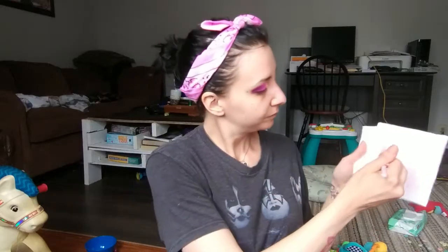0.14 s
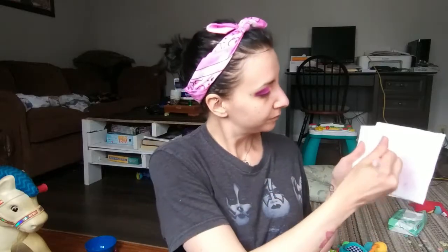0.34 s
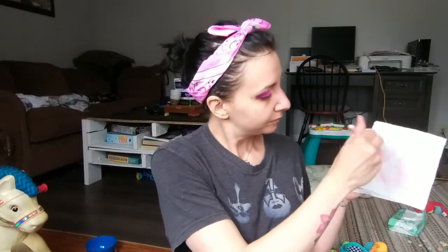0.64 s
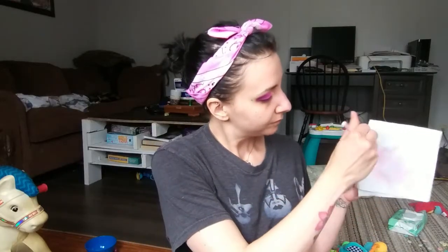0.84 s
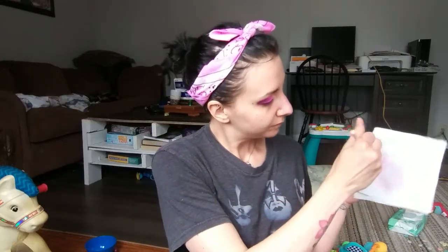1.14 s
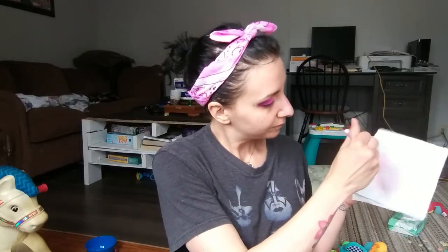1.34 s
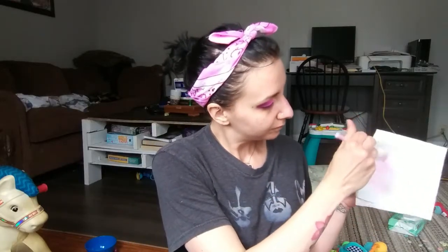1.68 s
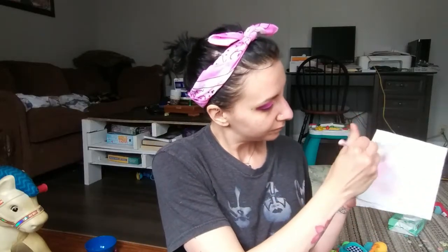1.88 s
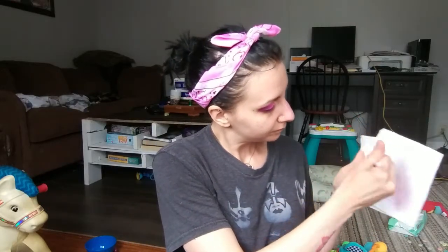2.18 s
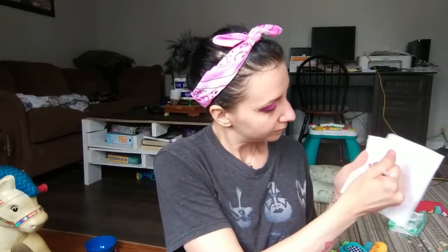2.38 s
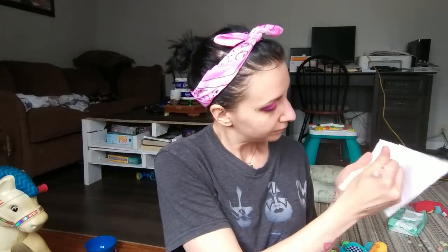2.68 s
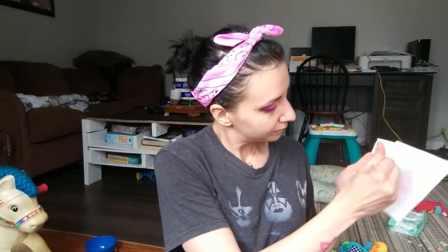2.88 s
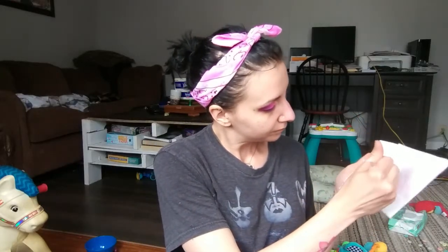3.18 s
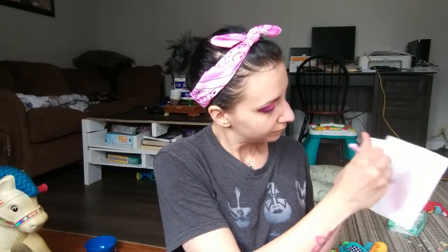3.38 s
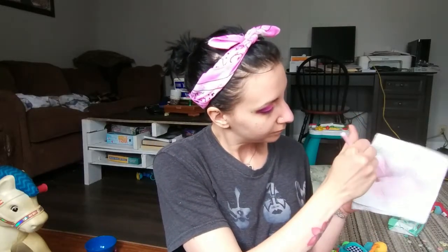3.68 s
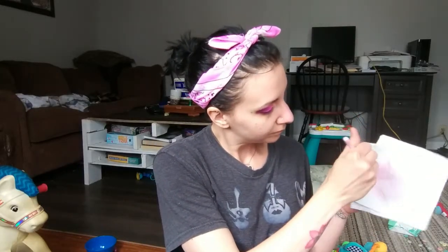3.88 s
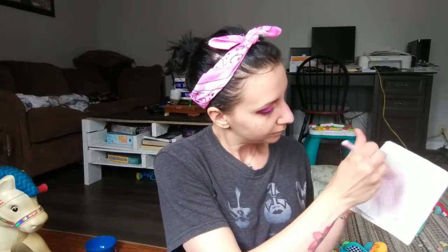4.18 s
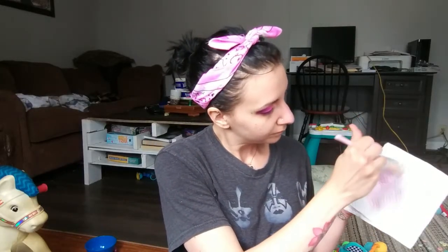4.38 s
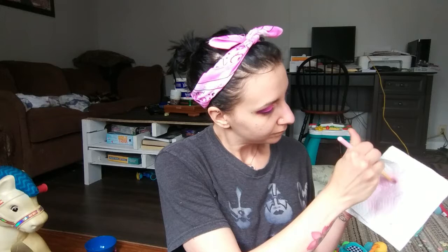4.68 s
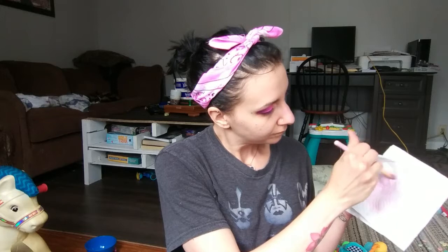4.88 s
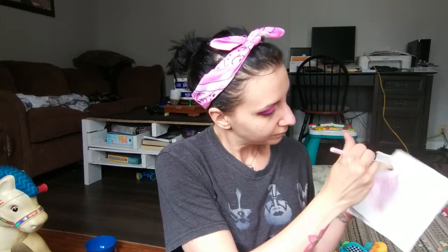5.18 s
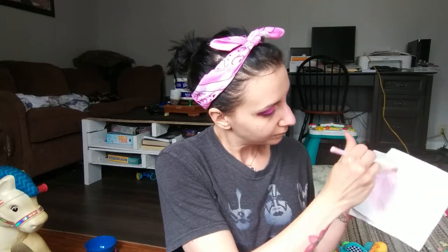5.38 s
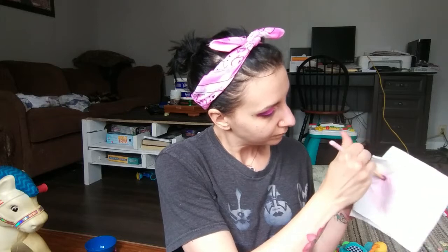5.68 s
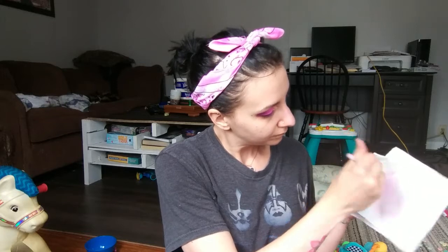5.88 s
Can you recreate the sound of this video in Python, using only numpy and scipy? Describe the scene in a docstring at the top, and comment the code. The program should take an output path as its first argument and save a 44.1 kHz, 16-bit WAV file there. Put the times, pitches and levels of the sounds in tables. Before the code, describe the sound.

A soft brush scrubs a paper towel back and forth in quick dry scratches, with small bright cracks, over a low wavering room hum.

```python
"""In a living room, close to a small stereo microphone, a makeup brush scrubs a hand-held paper towel.
About ten strokes a second: bristles flick as clumped random grains and now and then snag with a bright crack.
Behind them an appliance hums and blows: a beating tone, a motor tone, and noise that rings a duct.
Further off, shaped noise makes a dull scuff, a faint swelling hiss and a few soft low thuds.
Echoes die away in the furnished room, and the microphone port rings near 8 kHz."""
import sys
import numpy as np
from scipy import signal
from scipy.fft import rfft, irfft, next_fast_len
from scipy.io import wavfile

SR = 44100
rng = np.random.default_rng(int(sys.argv[2]) if len(sys.argv) > 2 else 0)


def file_out(sig):
    """Save sig as 16-bit WAV at sys.argv[1]."""
    # one column per channel
    cols = np.atleast_2d(sig).T
    # limit, then scale
    lim = np.clip(cols, -1, 1)
    pcm = np.round(lim * 32767).astype(np.int16)
    wavfile.write(sys.argv[1], SR, pcm)


N = 266805
TIME = np.arange(N) / SR   # [s]


def from_db(db):
    """Decibels to amplitude gain."""
    return 10 ** (np.asarray(db) / 20)


def rms_one(x):
    """Scale to unit power."""
    return x / np.sqrt(np.mean(x ** 2) + 1e-20)


def white_noise():
    """Noise with equal power at all frequencies."""
    return rng.standard_normal(N)


def coloured(x, spectrum):
    """Filter a signal by a smooth spectrum, with a falling bass below its first point; rms 1."""
    hz, db = np.transpose(spectrum)
    size = next_fast_len(N + SR)
    bins = np.maximum(np.fft.rfftfreq(size, 1 / SR), 1)
    gain = from_db(np.interp(np.log(bins), np.log(hz), db))
    gain = gain * np.minimum(bins / hz[0], 1) ** 2
    return rms_one(irfft(rfft(x, size) * gain, size)[:N])


def resonance(x, hz, width_hz):
    """Two-pole resonance with gain 1 on top."""
    r = np.exp(-np.pi * width_hz / SR)
    zeros = np.array([1, 0, -1]) * (1 - r * r) / 2
    poles = [1, -2 * r * np.cos(2 * np.pi * hz / SR), r * r]
    return signal.lfilter(zeros, poles, x + 1e-18)


def lowpass(x, hz):
    """Keep what lies below a frequency, without delay."""
    return signal.sosfiltfilt(signal.butter(2, hz, fs=SR, output="sos"), x)


def drift(rate):
    """Smooth chance with so many new random values a second; rms 1."""
    knots = rng.standard_normal(N // 10)
    return rms_one(np.interp(TIME * rate, np.arange(len(knots)), knots))


def swell(middle, length, squareness):
    """A rise and fall, flatter on top the higher its squareness."""
    distance = np.abs((TIME - middle) / (length / 2))
    return np.exp(-np.minimum(distance, 10) ** squareness)


def level(curve):
    """A dB curve as a gain in time."""
    return from_db(np.interp(TIME, *np.transpose(curve)))


def grains(per_s, spread_db):
    """Random tiny clicks of uneven size; rms 1."""
    struck = rng.random(N) < per_s / SR
    sizes = rng.standard_normal(N) * from_db(spread_db * rng.standard_normal(N))
    return rms_one(struck * sizes)


# colour of the hiss of each microphone's electronics: (frequency [Hz], relative density [dB per Hz])
ELECTRONICS_COLOUR = [(40, -4), (130, -23), (400, 10), (1500, -36), (4000, 0), (8000, 3), (12000, -4),
                      (15500, 13)]


def self_noise(noise_db=-83):
    """Each microphone channel has a very faint electronic hiss of its own."""
    channels = rng.standard_normal((2, N))
    return from_db(noise_db) * np.array([coloured(white, ELECTRONICS_COLOUR) for white in channels])


# air noise of the appliance and the room: (frequency [Hz], relative density [dB per Hz])
AIR_COLOUR = [(24, -16), (30, -23), (38, -2.5), (50, -4), (95, -3.5), (120, -1), (150, -7.5), (200, -5),
              (250, -13.5), (400, -20.5), (540, -25.5), (1000, -29), (2200, -34), (4500, -36), (15000, -52)]
# fainter motor tone: (frequency [Hz], rms level before the microphone [dB])
MOTOR_TONES = [(269.5, -69.5)]
# duct resonances rung by the air: (frequency [Hz], width [Hz], rms level before the microphone [dB])
DUCT_RESONANCES = [(181.2, 26, -66), (276.3, 25, -69.5), (367, 25, -74.5), (453.6, 20, -68.5),
                   (476.6, 19.5, -70.5), (643.5, 45, -78)]
MAINS_HZ, MAINS_DB = 120.0, -46.5
BEATS_PER_S, BEAT_DEPTH, BEAT_CREST_S = 2.3, 0.11, 0.094
WAVER_DB, WAVERS_PER_S = 1.0, 8   # the hum also wavers by chance


def mains_hum():
    """The mains hum beats against a motor that turns a little slower."""
    beat = 1 + BEAT_DEPTH * np.cos(2 * np.pi * BEATS_PER_S * (TIME - BEAT_CREST_S))
    wavering = from_db(MAINS_DB + WAVER_DB * drift(WAVERS_PER_S))
    return wavering * beat * np.sin(2 * np.pi * MAINS_HZ * TIME)


def duct():
    """Moving air rings each duct resonance; two passes steepen its skirts."""
    out = np.zeros(N)
    for hz, width, db in DUCT_RESONANCES:
        ringing = resonance(resonance(white_noise(), hz, width), hz, width)
        out += from_db(db) * rms_one(ringing)
    return out


def appliance(air_db=-50.5):
    """A gently beating hum, a faint motor tone, and moving air that rings a few duct resonances."""
    hum = mains_hum()
    tones = sum(from_db(db) * np.sin(2 * np.pi * (hz * TIME + rng.random())) for hz, db in MOTOR_TONES)
    air = from_db(air_db) * coloured(white_noise(), AIR_COLOUR)
    return np.sqrt(2) * (hum + tones) + duct() + air   # root two: from rms to peak


# rise and fall of the faint far hiss: (time [s], level before the microphone [dB])
HISS_LEVEL = [(0, -78), (3.5, -78), (4.2, -67.5), (5.05, -65), (5.25, -61.5), (5.4, -68), (6.05, -67.5)]
# colour of the hiss: (frequency [Hz], relative density [dB per Hz])
FAR_HISS_COLOUR = [(500, -11.5), (1100, -7), (1600, 0.5), (2100, 4.5), (2500, 7), (3200, -5.5), (5000, -13),
                   (10000, -27.5)]


def far_hiss():
    """Faint noise, strongest around 2.5 kHz, that swells and sinks."""
    return level(HISS_LEVEL) * coloured(white_noise(), FAR_HISS_COLOUR)


# soft low thuds: (middle time [s], length [s], level before the microphone [dB])
THUD_EVENTS = [(2.12, 0.16, -49), (2.505, 0.24, -53), (3.87, 0.26, -50), (5.653, 0.094, -44)]
# colour of the thuds: (frequency [Hz], relative density [dB per Hz])
LOW_THUD_COLOUR = [(30, -16.5), (39, 4), (46, 7), (60, 9), (90, 1), (200, -45)]


def thuds():
    """Short swells of deep noise."""
    swells = sum(from_db(db) * swell(middle, length, squareness=1.4) for middle, length, db in THUD_EVENTS)
    return swells * coloured(white_noise(), LOW_THUD_COLOUR)


# colour of the dull scuff: (frequency [Hz], relative density [dB per Hz])
DULL_SCUFF_COLOUR = [(120, -1), (300, 1.5), (410, -9), (550, 0), (740, 0), (820, -5.5), (910, 4),
                     (1050, -5), (1250, -6), (1420, -14), (2100, -12), (2400, -18), (2900, -19.5),
                     (3300, -22), (6000, -43)]
SCUFF_START_S, SCUFF_ATTACK_S, SCUFF_HOLD_S = 0.046, 0.031, 0.05
SCUFF_FALL_DB_PER_S, SCUFF_DB = 177, -44.5


def scuff():
    """A dull, grainy scuff further off that sets in quickly, holds and dies away."""
    age = TIME - SCUFF_START_S
    attack = np.clip(age / SCUFF_ATTACK_S, 0, 1)
    fall_db = SCUFF_FALL_DB_PER_S * np.clip(age - SCUFF_ATTACK_S - SCUFF_HOLD_S, 0, 1)
    rubbing = coloured(grains(per_s=5000, spread_db=0.5), DULL_SCUFF_COLOUR)
    return attack * from_db(SCUFF_DB - fall_db) * rubbing


def far_sounds():
    """The scuff, the slowly swelling hiss and the low thuds."""
    return scuff() + far_hiss() + thuds()


ROOM_DB, ROOM_T60_S = -6.5, 0.59   # echo level against the near sound; time to die by 60 dB


def room(x, first_echo_s=0.0033):
    """Dense echoes of a furnished room, dying away evenly."""
    t = TIME[:SR // 2]
    echoes = rng.standard_normal(len(t)) * from_db(-60 * t / ROOM_T60_S) * (t > first_echo_s)
    return signal.fftconvolve(x, echoes / np.linalg.norm(echoes))[:N]


def sideways(x, apart_hz=12000, side_db=-13):
    """Echoes that arrive from the sides differ between left and right, in the treble only."""
    side = signal.sosfilt(signal.butter(2, apart_hz, "high", fs=SR, output="sos"), room(x))
    return from_db(side_db) * np.array([side, -side])


# bristles snagging on the paper: (time [s], relative level [dB])
SNAG_EVENTS = [(0.5523, -26.5), (1.749, -27), (1.965, -18.5), (3.1553, -37), (5.6714, -21), (5.797, -21)]
# colour of the cracks: (frequency [Hz], relative density [dB per Hz])
CRACK_COLOUR = [(1000, -10), (4000, -4), (8000, 13), (11000, 0), (15000, -14)]
SNAG_DB = -9   # gain of all snags


def snags(decay_s=0.0018, crest_db=-15.0):
    """A tuft caught on the embossing lets go with a short, bright crack."""
    out = np.zeros(N)
    for s, db in SNAG_EVENTS:
        out += from_db(db + crest_db) * (TIME >= s) * np.exp(-np.abs(TIME - s) / decay_s)
    return from_db(SNAG_DB) * out * coloured(white_noise(), CRACK_COLOUR)


# rubs, each a stroke out and a stroke back:
# (middle time of the out stroke [s], its length [s], relative out level [dB], relative back level [dB])
BRUSH_RUBS = [(0.16, 0.074, -69.5, -58), (0.375, 0.055, -53, -55.5), (0.566, .058, -54, -58.5),
              (0.757, 0.063, -48, -51.5), (0.945, .06, -51.5, -47.5), (1.136, 0.06, -56, -52),
              (1.325, 0.061, -55.5, -49.5), (1.506, 0.056, -52, -47.5), (1.698, 0.062, -50, -51),
              (1.886, 0.064, -47.5, -48.5), (2.092, 0.065, -56.5, -56.5), (2.313, 0.054, -54.5, -54.5),
              (2.507, 0.066, -51, -52), (2.7, 0.062, -53, -51), (2.894, 0.061, -51, -53),
              (3.082, .051, -57, -49.5), (3.265, 0.053, -53.5, -55), (3.456, 0.061, -61.5, -60.5),
              (3.66, 0.069, -50, -48.5), (3.848, 0.06, -52, -55.5), (4.061, 0.073, -56, -55),
              (4.27, 0.059, -58, -53), (4.463, 0.051, -51, -50), (4.652, 0.06, -50, -50.5),
              (4.847, 0.052, -48, -48.5), (5.035, 0.064, -52.5, -51), (5.238, .058, -56, -60),
              (5.42, 0.068, -59, -55.5), (5.613, .068, -50.5, -52), (5.81, 0.057, -48.5, -49),
              (6.015, 0.064, -57, -58)]
RETURN_S = 0.079   # from the out stroke to the back stroke
BACK_LENGTH_SHARE, BACK_BODY_DB = 0.93, 0.5   # the back stroke is a little shorter and fuller


def strokes():
    """Each rub goes out and comes straight back: (middle s, length s, relative level dB, extra body dB)."""
    for s, length, out_db, back_db in BRUSH_RUBS:
        yield s, length, out_db, 0
        yield s + RETURN_S, BACK_LENGTH_SHARE * length, back_db, BACK_BODY_DB


# colour of bristles on paper: (frequency [Hz], relative density [dB per Hz])
BRISTLE_COLOUR = [(250, -48), (600, 3), (1000, 2), (2000, 2.5), (3600, 1.1), (4300, -0.2), (6000, 0.76),
                  (8200, 3.5), (9000, 1), (9900, -4), (11000, -10), (12200, -12), (15500, -11.5)]


def bristle_flicks(flicks_per_s=14000, spread_db=1.0, clump_db=1.77, clumps_per_s=260):
    """Bristles flick over the paper fibres as tiny clicks that come in clumps."""
    clumps = from_db(clump_db * drift(clumps_per_s))
    return coloured(grains(flicks_per_s, spread_db) * clumps, BRISTLE_COLOUR)


# body the sheet adds where the brush is working: (time [s], relative level [dB])
SHEET_BODY = [(.4, 0), (.94, -4.5), (1.03, 1.5), (1.5, 0.5), (1.8, 0), (2.8, -1.5), (3.2, -2), (3.9, 0.5),
              (4.7, -4), (5.05, -6.5), (5.55, 2), (6.05, -2)]
DEEP_HZ = 3400   # a stroke's extra body lies below this
USUAL_STROKE_DB, DULLING_DB_PER_DB = -55, 0.41   # strokes lighter than usual are duller
BRUSH_DB = -5.5   # gain of all strokes


def brush(body_hz=5500, squareness=3.5, body_squareness=2.03, body_gain_db=1.0):
    """Bristles flick while the hand moves; the sheet adds body in mid-stroke, where the pressure peaks."""
    flicks = bristle_flicks()
    body = lowpass(flicks, body_hz)
    deep = lowpass(body, DEEP_HZ)
    out = np.zeros(N)
    for middle, length, db, extra_db in strokes():
        dulling_db = DULLING_DB_PER_DB * (USUAL_STROKE_DB - db)
        body_db = np.interp(middle, *np.transpose(SHEET_BODY)) + extra_db + dulling_db
        tips = swell(middle, length, squareness) * (flicks - body)
        sheet = swell(middle, length, body_squareness) * (body - deep + from_db(body_db) * deep)
        out += from_db(db) * (tips + from_db(body_gain_db) * sheet)
    return from_db(BRUSH_DB) * out


# broad resonances of the paper sheet: (frequency [Hz], width [Hz])
SHEET_RESONANCES = [(1050, 390), (1700, 780), (2500, 330), (3700, 310), (5200, 610), (7500, 630),
                    (9000, 810)]


def on_sheet(x, patchy_db=3.0, shifts_per_s=16):
    """Each spot of the paper favours other resonances, so their strengths drift by chance."""
    out = x
    for hz, width in SHEET_RESONANCES:
        out = out + (from_db(patchy_db * drift(shifts_per_s)) - 1) * resonance(x, hz, width)
    return out


def stereo(x, mono_below_hz=2100):
    """Stereo: the left treble comes a sample late; the bass is kept nearly mono."""
    late = np.r_[0, x[:-1]]
    treble = signal.butter(1, mono_below_hz, "high", fs=SR, output="sos")
    side = signal.sosfiltfilt(treble, (late - x) / 2)
    return (late + x) / 2 + np.array([side, -side])


def scene():
    """The near brush with its room echoes, over the background."""
    near = on_sheet(brush() + snags())
    middle = near + from_db(ROOM_DB) * room(near) + appliance() + far_sounds()
    return stereo(middle) + sideways(near) + self_noise()


def record(dry, port_hz=8300, port_width_hz=700, port_db=9.0, low_cut_hz=31, top_cut_hz=15750):
    """The microphone port rings in the treble; the deepest bass and the top are cut."""
    heard = dry + from_db(port_db) * resonance(dry, port_hz, port_width_hz)
    heard = signal.sosfilt(signal.butter(8, low_cut_hz, "high", fs=SR, output="sos"), heard)
    return signal.sosfilt(signal.ellip(12, 0.1, 80, top_cut_hz, fs=SR, output="sos"), heard)


dry = scene()
out = record(dry)
file_out(out)
```